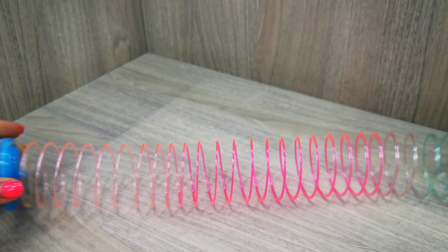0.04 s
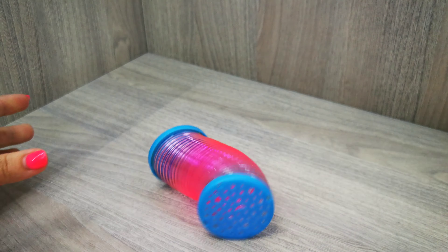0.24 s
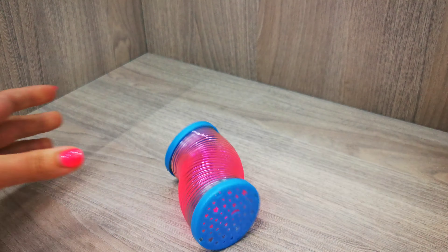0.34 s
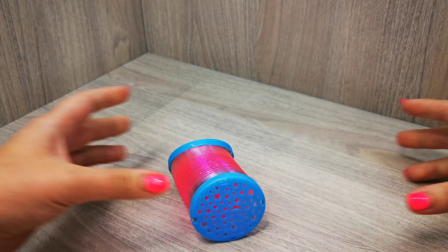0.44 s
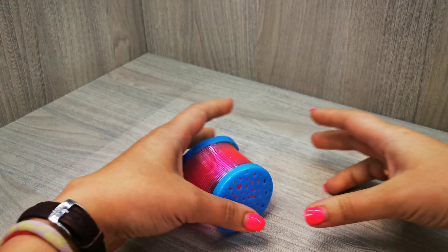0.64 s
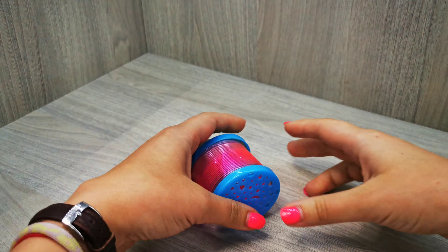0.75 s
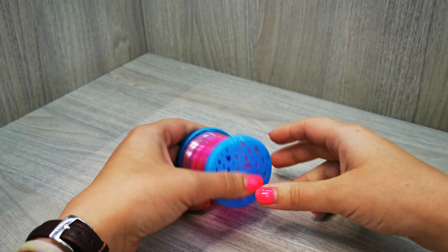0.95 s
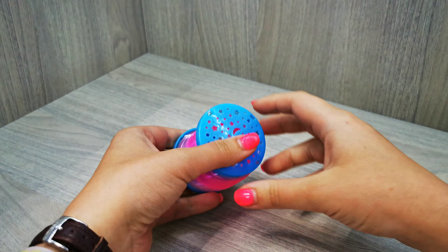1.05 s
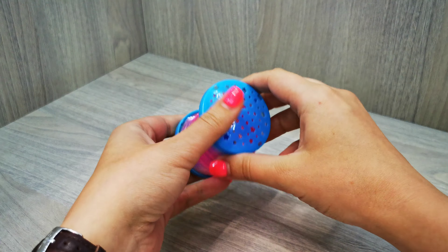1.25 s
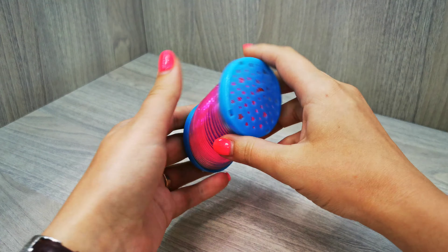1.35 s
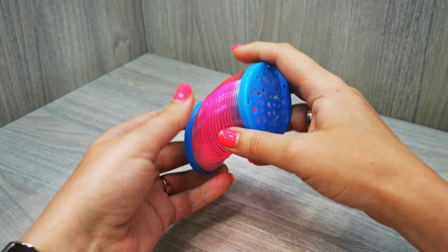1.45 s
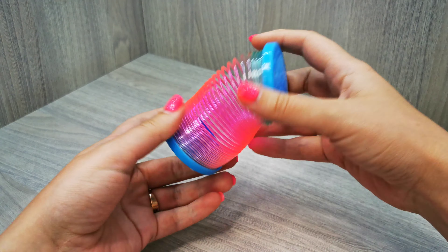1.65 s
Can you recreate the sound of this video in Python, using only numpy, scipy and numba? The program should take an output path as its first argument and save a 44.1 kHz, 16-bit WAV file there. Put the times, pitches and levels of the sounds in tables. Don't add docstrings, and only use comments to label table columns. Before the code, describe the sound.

Plastic spring toy snaps closed in a fast bright clatter over two low wooden knocks, settles with smaller clicks, then soft handling ticks; recorded close in stereo, short room echo, low quiet room tone.

```python
import sys
import numpy as np
from scipy import signal
from scipy.fft import rfft, irfft
from scipy.io import wavfile
from scipy.ndimage import uniform_filter1d, map_coordinates
from numba import njit

SR = 44100
rng = np.random.default_rng(int(sys.argv[2]) if len(sys.argv) > 2 else 0)


def put_to_file(sound):
    columns = np.atleast_2d(sound).T
    safe = np.clip(columns, -1, 1)
    whole_steps = np.round(safe * 32767)
    wavfile.write(sys.argv[1], SR, whole_steps.astype(np.int16))


def volts(x):
    e = np.asarray(x, float) / 20
    return 10 ** e


N = 74970

# time in s, rattle level in dB, left-right difference in dB.
COIL_MOTION = [(0, -63, -4), (.1, -63, -4.5), (.183, -61.5, -6.5), (.212, -50.5, -6), (.26, -38, -6),
               (.316, -43.5, -7.5), (.36, -55, 2), (.4, -52, -3), (.51, -53, -2), (.565, -46, -1),
               (.61, -52.5, -3), (.715, -68, -3), (.745, -53, -3), (.808, -64, -5), (.846, -47.5, -4.5),
               (.93, -56, -3), (.955, -74.5, -4), (1.08, -77, -2)]
# time in s, rattle level in dB.
FINGER_RATTLE = [
    (1.42, -96.5),
    (1.445, -63),
    (1.47, -59),
    (1.5, -74),
    (1.53, -78.5),
    (1.56, -67),
    (1.59, -65.5),
    (1.66, -67.5),
    (1.7, -66),
]
# time in s, level in dB, t60 in s, dull share in dB.
TURN_CLAPS = [(0.0373, -45, 0.058, 3), (0.121, -65, 0.13, 11), (0.1905, -46.5, 0.074, -37),
              (.209, -40.5, 0.09, -20), (0.2325, -32.5, 0.066, -7), (0.2357, -31.5, .03, -14),
              (0.2433, -35.5, 0.033, -16), (0.295, -35.5, 0.07, -11), (0.322, -33.5, 0.078, -34),
              (0.328, -22, 0.04, -26), (.331, -26, 0.022, -26.5), (0.3357, -22.5, 0.036, -18.5),
              (0.341, -32, 0.022, -16.5), (.416, -56.5, .08, 18), (0.4684, -36, 0.06, -18),
              (.477, -54, 0.029, 0), (0.533, -43, 0.05, -24), (0.561, -48, 0.022, -11),
              (.573, -41.5, 0.023, -4), (0.5769, -38, 0.027, -5), (0.584, -55, 0.016, -5),
              (0.677, -64, 0.018, 9), (0.729, -70, 0.43, 21), (0.82, -47.5, 0.03, -35),
              (0.88, -53, 0.072, -4), (.986, -69.5, 0.16, 16), (1.042, -58.5, 0.014, -8),
              (1.133, -50.5, 0.045, -5.5), (1.3, -60, 0.055, -5), (1.438, -72, 0.054, 3),
              (1.461, -70.5, .05, -24), (1.472, -46.5, 0.022, -23), (1.477, -54, .03, -27),
              (1.562, -64, 0.022, 20), (1.593, -56.5, 0.043, 5.5), (1.624, -55.5, 0.035, -9),
              (1.641, -55, 0.037, -6), (1.679, -52.5, 0.026, -18), (1.686, -50.5, 0.024, -19)]
# time in s, level in dB, pitch in Hz, t60 in s.
RINGING_PARTS = [(0.138, -55, 2460, 0.42), (0.264, -35.5, 2710, 0.054), (0.331, -24, 1957, 0.046),
                 (0.335, -21.5, 4910, 0.022), (0.559, -51.5, 2870, 0.44), (0.677, -51, 1760, 0.028),
                 (0.728, -57.5, 1000, 0.079), (0.841, -45.5, 6650, 0.06), (0.874, -42, 1005, 0.12),
                 (1.045, -60, 4770, 0.033), (1.131, -52.5, 1053, 0.067), (1.134, -52, 1760, 0.057),
                 (1.132, -52, 4740, 0.045), (1.298, -62.5, 1770, 0.077), (1.3, -59, 1073, 0.039),
                 (1.438, -59, 5250, 0.13), (1.473, -57, 1036, 0.037), (1.583, -61, 1420, 0.073),
                 (1.687, -65, 3450, .04)]
# frequency in Hz, width in Hz, level in dB.
TURN_PEAKS = [(2340, 1200, 0), (2460, 270, 2.5), (3190, 380, 1), (4100, 270, 0.5), (4755, 700, 4.5),
              (5500, 770, -1), (6780, 490, 3.5), (8730, 5900, -6.5), (10870, 630, -3.5), (13120, 4340, -2),
              (15500, 740, -11.5)]
# frequency in Hz, width in Hz, level in dB.
CAP_PEAKS = [(904, 480, 5.5), (1570, 330, -11.5), (1960, 200, 1), (2700, 840, 0.5)]


def coil():
    flicker_db, slide_dull_db, grain_db = 0.5, 5.5, 1.5
    ring_cycles, plastic_from_hz = 21, 940
    bright = volts(curve(COIL_MOTION)) + volts(curve(FINGER_RATTLE))
    bright = bright * volts(flicker_db * walk(59.4))
    dull = bright * volts(slide_dull_db)
    for s, db, t60, dull_db in TURN_CLAPS:
        bright = bright + burst(s, db, t60)
        dull = dull + burst(s, db + dull_db, t60)
    grain = volts(grain_db * walk(500))
    ticks = clicks()
    parts = 0
    for s, db, hz, t60 in RINGING_PARTS:
        parts = parts + mode(ticks * burst(s, db, t60), hz, ring_cycles / hz)
    plastic = body(bright * grain, TURN_PEAKS) + body(dull * grain, CAP_PEAKS)
    out = high(plastic, plastic_from_hz, order=3) + parts
    pan_db = curve(COIL_MOTION, col=2)
    return out * volts(np.array([pan_db, -pan_db]) / 2)


def body(env, peaks):
    colour_db, free_s, free_treble_db = -0.5, 0.262, 4
    t = np.arange(N) / SR
    free_db = free_treble_db * (np.abs(t - free_s) < free_s / 3)
    out = 0
    for hz, width_hz, db in peaks:
        gain = volts(db - 12 + colour_db * walk(40) + free_db * (hz > 10000))
        rung = mode(clicks() * env, hz, 2.19 / width_hz)
        out = out + gain * np.sqrt(width_hz / 1000) * rung
    return out


def tick_train():
    clicks_per_s, scatter_db = 4000, 3.5
    struck = rng.random(N) < clicks_per_s / SR
    scatter = volts(scatter_db * np.minimum(rng.exponential(size=N), 2))
    return unit(struck * rng.standard_normal(N) * scatter)


def clicks():
    port_lag_s, port_like = -0.0001, 0.38
    same = tick_train()
    lagged = map_coordinates(same, [np.arange(N) - port_lag_s * SR], mode="mirror")
    own = np.array([tick_train(), tick_train()])
    return np.sqrt(port_like) * np.array([same, lagged]) + np.sqrt(1 - port_like) * own


def burst(s, db, t60):
    rise_s = 0.0033
    t = np.arange(N) / SR
    rise = np.clip(1 + (t - s) / rise_s, 0, 1) ** 2
    return volts(db) * np.where(t < s, rise, volts(-60 * np.abs(t - s) / t60))


# time in s, level in dB, pitch in Hz, t60 in s, left-right
# difference in dB.
LONE_TICKS = [(.1905, -58, 1960, .04, -8), (.2075, -62, 4600, .03, -3), (0.212, -46, 2600, .06, -3),
              (.2325, -34.5, 2314, .07, -15.5), (0.2336, -39.5, 1410, 0.037, -13),
              (0.2345, -35, 2480, 0.1, -7.5), (.236, -32.5, 4760, 0.018, 10),
              (0.2455, -42, 5140, 0.033, -3), (0.298, -36.5, 2950, .04, -7.5),
              (0.299, -44.5, 1408, 0.042, -2.5), (0.3304, -27, 6910, 0.024, -5),
              (0.335, -34, 12230, 0.012, -1.5), (0.3354, -29, 2000, 0.049, -4.5),
              (.308, -34, 488, .07, -11.5), (.244, -32.5, 580, .1, -5), (.372, -37.5, 102, 0.28, 1),
              (.262, -27.5, 104.3, .15, -0.5), (0.979, -53, 188, 0.11, 3), (.994, -50, 192.4, 0.13, 4),
              (.4675, -49, 2130, 0.12, -15), (0.4692, -48.5, 1515, 0.035, 7), (.5605, -64, 7000, 0.017, -1),
              (1.1335, -61.5, 5860, 0.058, 1), (1.133, -61, 2700, 0.045, 3.5), (1.472, -52, 5500, .03, -2),
              (1.4705, -74.5, 2530, 0.019, -3.5), (1.5595, -55.5, 1000, 0.036, 3),
              (1.5595, -61, 5400, .03, -3), (1.5595, -71, 3360, 0.053, 2), (1.592, -70, 2050, .04, -7),
              (1.625, -55, 5600, 0.018, 3), (1.641, -58.5, 7400, .025, 6.5), (1.679, -63, 4830, 0.038, 0),
              (1.687, -53.5, 5800, 0.036, 0), (1.687, -58, 3540, 0.039, 10)]


def pings():
    out = np.zeros((2, N))
    for s, db, hz, t60, pan_db in LONE_TICKS:
        hit = np.eye(1, N, int(s * SR))[0] * volts(db)
        main_tone = ring(hit, float(hz), float(t60))
        pair = np.array([main_tone + 0.4 * ring(hit, hz * near, t60 * 0.26) for near in (1.03, 0.97)])
        out = out + pair * left_right(pan_db)
    return out


# time in s, level in dB, push length in s, rim knock level in dB.
TABLE_THUMPS = [(.19, -32, 0.0039, -41), (0.2332, -8.5, 0.002, -18.5), (0.241, -19, 0.00081, -38),
                (0.2447, -20.5, 0.00024, -25), (0.263, -23, 0.0038, -43.5), (0.2956, -13, 0.0015, -23.5),
                (.306, -63, 0.00072, -39), (.311, -54, 0.0032, -41), (0.4153, -33.5, 0.0012, -38),
                (.425, -30.5, 0.0017, -35.5), (.434, -34.5, 0.0023, -35.5), (1.026, -45.5, 0.0011, -53.5),
                (1.043, -51, 0.0016, -52.5)]
# time in s, level in dB, share of the deepest mode in dB.
ROLLING_WEIGHT = [(0, -51.5, 5.5), (.1, -56, -20), (.18, -53, -9), (.2, -49, -12), (.3, -33.5, -3),
                  (.35, -37, 8.5), (.41, -43.5, 16.5), (.47, -54.5, 11.5), (.49, -53.5, -18),
                  (.576, -44.5, -21), (.62, -51.5, -9), (.72, -55.5, 7.5), (.8, -55, 5.5), (.87, -50.5, 3),
                  (.96, -64.5, 2), (1, -60, -9), (1.04, -58, 13.5), (1.1, -91, 15)]
# frequency in Hz, level in dB, t60 in s.
LOW_MODES = [(102, -1, .13), (147, 2, .09), (183, -6, .09), (224, -4, .08), (300, -8, .06)]
# frequency in Hz, level in dB, t60 in s.
UPPER_MODES = [(352.4, -1, 0.054), (456, -2, 0.058), (580, -1, 0.05), (738.6, 2.5, 0.055),
               (848.7, 7.5, 0.065), (1000, -18, 0.014), (1340, -15.5, 0.019), (2690, -18.5, 0.098)]
# frequency in Hz, level in dB, t60 in s.
ROLLED_MODES = [(147, 1.5, 0.13), (183, -7, .1), (323, -12, .07), (488, -9, 0.2)]


def table():
    knock_s, roll_flicker_db, roll_upper_db = 0.0012, -3.5, -4.5
    pan_db, upper_pan_db, side_db, upper_side_db = 0.5, -5, -15.5, -10
    t, push, knock = np.arange(N) / SR, 0, 0
    for s, db, push_s, knock_db in TABLE_THUMPS:
        push = push - volts(db) * half_sine(s, push_s)
        knock = knock - volts(knock_db) * half_sine(s, knock_s)
    lifted_db = -37 * (t > 1.12)
    load_db = curve(ROLLING_WEIGHT) + lifted_db + roll_flicker_db * walk(21) - 26.5
    load = uniform_filter1d(rng.standard_normal((3, N)), size=48) * volts(load_db)

    deepest = table_top(push + load[0] * volts(curve(ROLLING_WEIGHT, col=2)), LOW_MODES[:1])
    deep = deepest + table_top(push, LOW_MODES[1:]) + table_top(load[0], ROLLED_MODES)
    upper = table_top(knock + load[1] * volts(roll_upper_db), UPPER_MODES)

    low_side = high(table_top(load[2] - push, LOW_MODES[1:]), 150)
    rim = np.diff(knock, prepend=0) * 12
    upper_side = table_top(load[2] * volts(roll_upper_db) + rim, UPPER_MODES)
    side = volts(side_db) * low_side + volts(upper_side_db) * upper_side
    both = deep + upper * left_right(upper_pan_db) + side * np.array([[1], [-1]])
    return high(both, 128, order=3) * left_right(pan_db)


def half_sine(s, length_s):
    phase = np.clip((np.arange(N) / SR - s) / length_s, 0, 1)
    return np.sin(np.pi * phase) / (length_s * SR)


def table_top(force, modes):
    out = 0
    for k, (hz, db, t60) in enumerate(modes):
        out = out + volts(db) * ring(force, float(hz), float(t60)) * (-1) ** (k // 5)
    return out


# frequency in Hz, level in dB per Hz.
ROOM_SPECTRUM = [(20, 11), (45, -2), (75, -29), (105, -8.5), (180, -20), (320, -21.5), (600, -30.5),
                 (16000, -58.5)]


def room():
    room_db, hum_hz, hum_db, hum_from_s, hum_to_s = -54.5, 141, -69, 1.1, 1.42
    t = np.arange(N) / SR
    hz = np.maximum(np.fft.rfftfreq(N, 1 / SR), 1)
    points = np.array(ROOM_SPECTRUM)
    gain = volts(np.interp(np.log(hz), np.log(points[:, 0]), points[:, 1]))
    mid, side = rfft(rng.standard_normal((2, N))) * gain
    width = np.clip(hz / 900, 0.2, 1)
    tone = irfft(mid + side * width * np.array([[1], [-1]]), N)
    drift = volts(1.5 * walk(4.8))
    on = np.clip(np.minimum(t - hum_from_s, hum_to_s - t) / 0.05, 0, 1)
    hum = volts(hum_db) * on * 1.72 * np.sin(2 * np.pi * hum_hz * t)
    return unit(tone) * volts(room_db) * drift + hum


@njit
def ring(x, hz, t60):
    y, z = np.empty(len(x)), 0j
    p = np.exp(2j * np.pi * hz / SR - np.log(1000.) / (t60 * SR))
    for i in range(len(x)):
        z = z * p + x[i]
        y[i] = z.imag
    return y


def ring_twice(x, hz, t60):
    return ring(ring(x, float(hz), t60 / 2), float(hz), t60 / 2)


def mode(x, hz, t60):
    response = ring_twice(np.eye(1, SR // 10)[0], hz, t60)
    return np.array([ring_twice(v, hz, t60) for v in x]) / np.sqrt(np.sum(response ** 2))


def unit(x):
    return x / np.sqrt(np.mean(x ** 2))


def curve(rows, col=1):
    a = np.array(rows, float)
    return np.interp(np.arange(N) / SR, a[:, 0], a[:, col])


def walk(rate_hz):
    k = int(SR / rate_hz)
    held = np.repeat(rng.standard_normal(N // k + 1), k)
    return 0.43 * uniform_filter1d(uniform_filter1d(held, k), k)[:N]


def left_right(db):
    return volts(np.array([[db], [-db]]) / 2)


def high(x, hz, order=2):
    return signal.sosfilt(signal.butter(order, hz, "high", fs=SR, output="sos"), x)


def scene():
    echo_t60_s, echo_db = 0.11, -11.5
    near = coil() + pings() + table()
    t = np.arange(SR // 3) / SR
    echo = rng.standard_normal((2, len(t))) * volts(-60 * t / echo_t60_s) * (t > 0.003)
    echo = echo / np.sqrt(np.sum(echo ** 2, axis=1, keepdims=True))
    wet = signal.fftconvolve(near, echo, axes=1)[:, :N]
    return near + volts(echo_db) * wet + room()


def roll_off(x):
    return signal.sosfilt(signal.butter(12, 16820, fs=SR, output="sos"), x)


def record(dry):
    low_cut_hz, top_hz = 14, 15900
    rounded = high(np.tanh(dry), low_cut_hz, order=1)
    low_pass = signal.ellip(8, 0.2, 70, top_hz, fs=SR, output="sos")
    mix = signal.sosfilt(low_pass, rounded)
    return roll_off(mix)


dry = scene()
out = record(dry)
put_to_file(out)
```